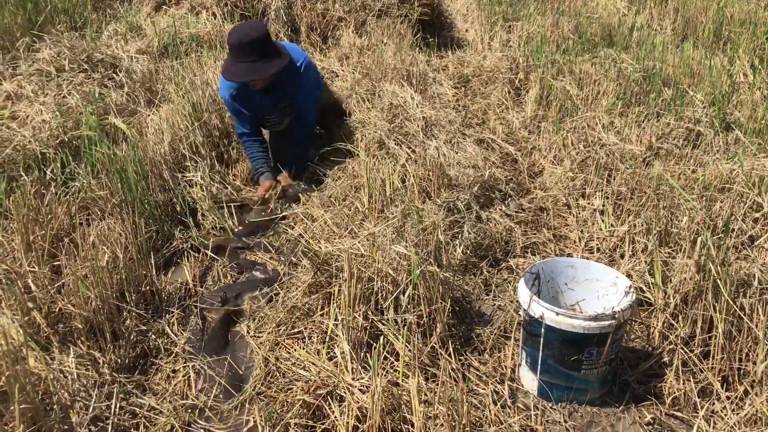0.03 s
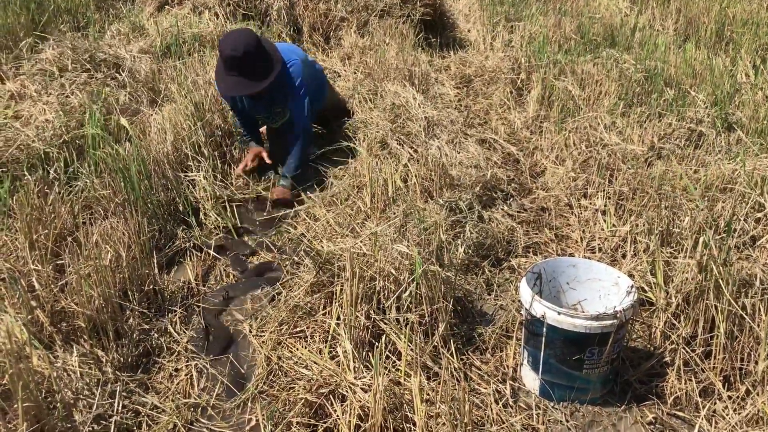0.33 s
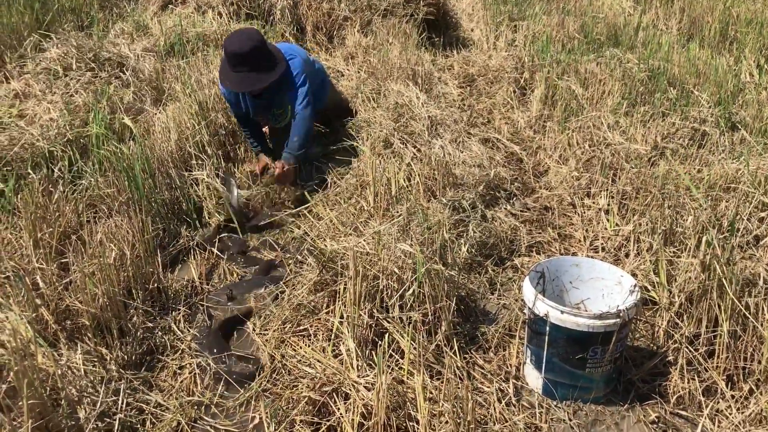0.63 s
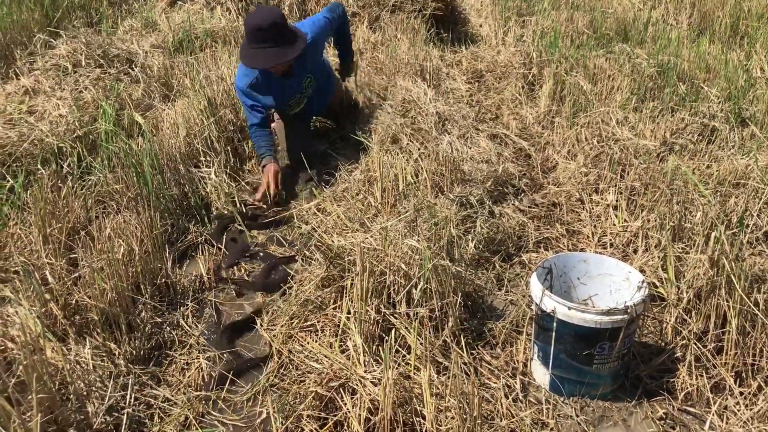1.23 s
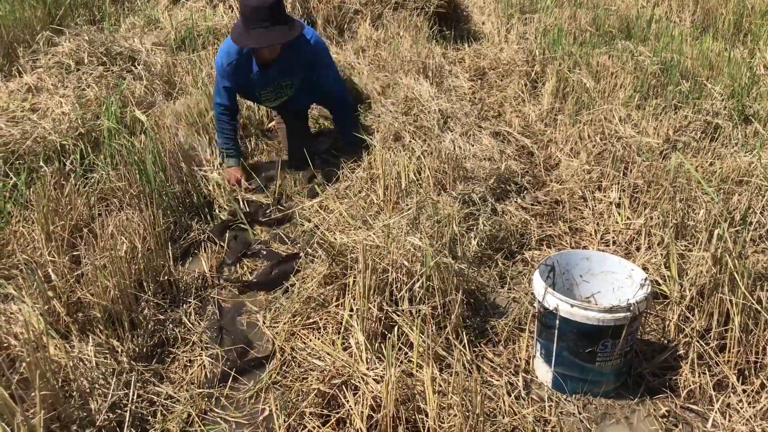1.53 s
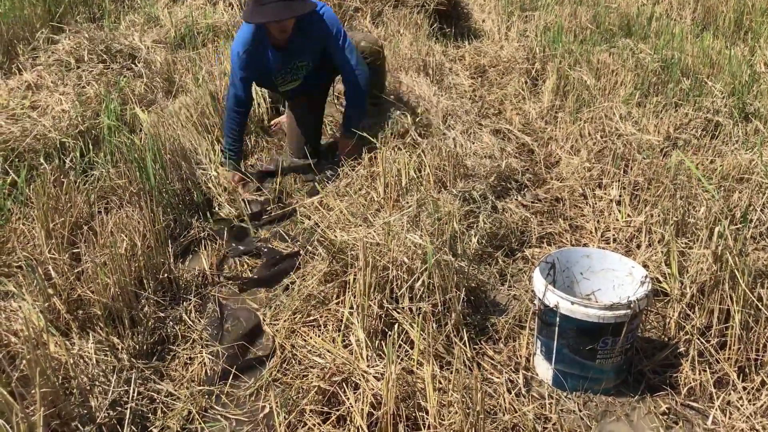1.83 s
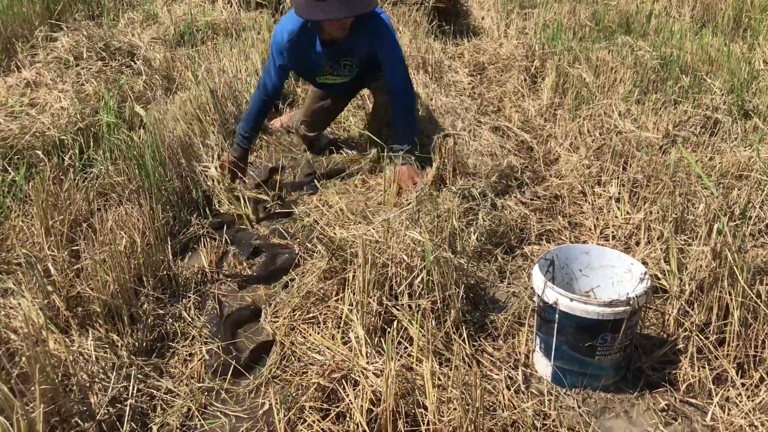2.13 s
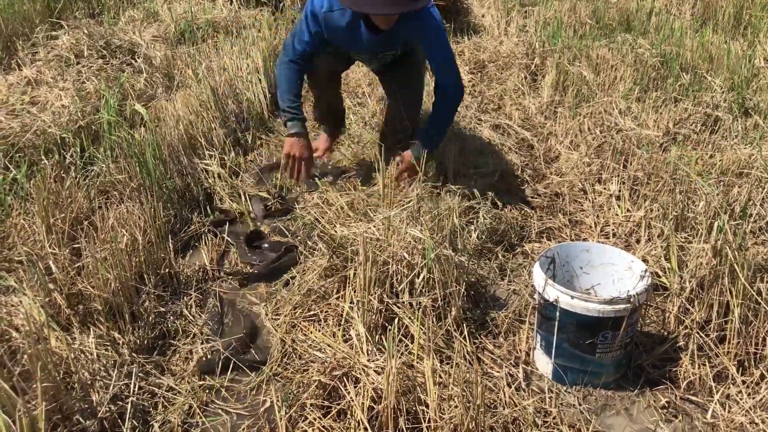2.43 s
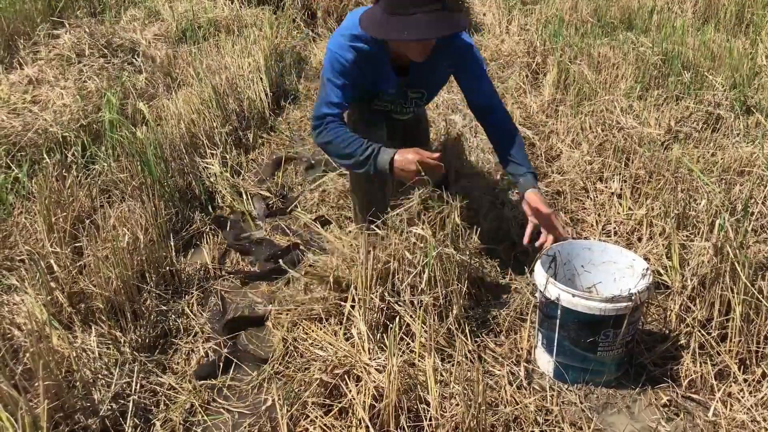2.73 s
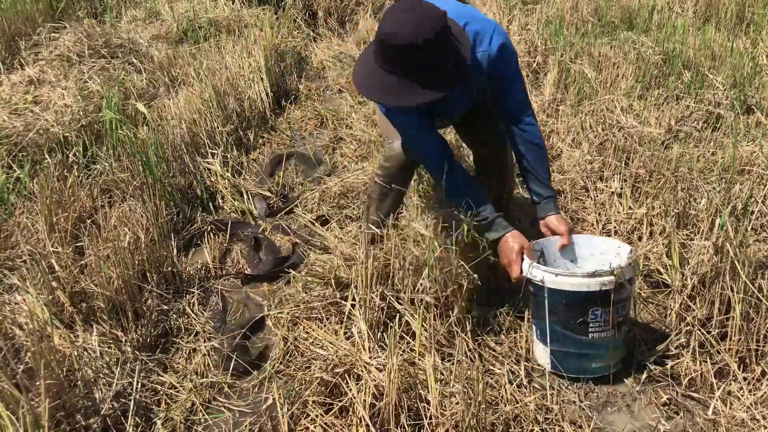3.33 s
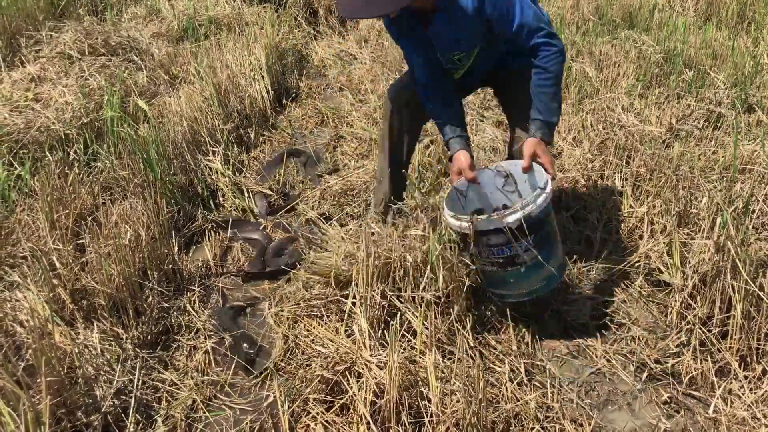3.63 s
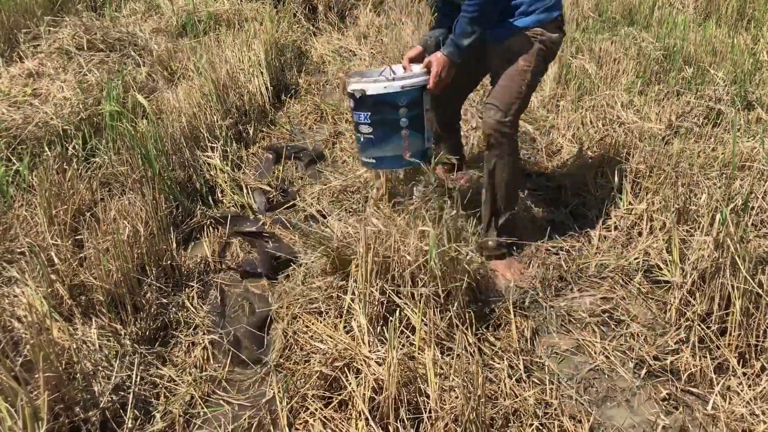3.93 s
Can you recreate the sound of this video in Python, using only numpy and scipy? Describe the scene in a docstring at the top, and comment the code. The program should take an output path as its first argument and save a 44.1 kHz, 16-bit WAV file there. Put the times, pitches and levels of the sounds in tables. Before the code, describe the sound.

Someone moves through rustling dry stubble as wind rumbles, then a plastic bucket knocks.

```python
"""Someone crawls and steps through dry rice stubble, comes closer and lifts a plastic bucket.
At first wind rumbles and thuds on the microphone, over a faint field hush and a few snapping stalks.
From about 1.6 s the straw, a cloud of tiny cracks, swishes louder; from 2 s bundles crunch.
After 3 s the bucket and its handle knock, and stalks patter along its wall as it is pulled up."""
import sys
import numpy as np
from scipy import signal
from scipy.fft import rfft, irfft
from scipy.io import wavfile
from scipy.ndimage import uniform_filter1d

SR = 44100
rng = np.random.default_rng(int(sys.argv[2]) if len(sys.argv) > 2 else 0)


def log_audio(samples):
    """Write samples as a 16-bit WAV file to the path given in sys.argv[1]."""
    # one column per channel
    frames = np.atleast_2d(samples).T
    # limit to full scale, then quantise
    limited = np.clip(frames, -1, 1)
    pcm = np.round(limited * 32767).astype(np.int16)
    wavfile.write(sys.argv[1], SR, pcm)


N = 176400
TIME, FREQS = np.arange(N) / SR, np.fft.rfftfreq(N, 1 / SR)
HIT_AGE = TIME[:SR // 20]  # seconds since a hit began

# How hard the straw is brushed. Each row: time in seconds, level in dB.
BRUSHING = [(.42, -55), (.51, -46.5), (.6, -60.5), (.9, -56), (1.1, -44.5), (1.36, -54.5), (1.53, -66),
            (1.63, -40), (1.78, -45.5), (1.92, -38.5), (2.07, -38), (2.14, -45.5), (2.27, -34), (2.36, -49),
            (2.61, -46.5), (2.66, -34.5), (2.79, -38.5), (2.89, -47.5), (3.04, -39.5), (3.16, -46),
            (3.41, -40), (3.48, -47), (3.68, -45), (3.85, -39)]
# Tone of brushed straw as heard through the microphone, including the microphone's treble peaks
# and dips. Each row: frequency in Hz, gain in dB.
STRAW_MIC_EQ = [(500, 6.5), (1000, -11), (3200, 1), (3800, -6.5), (4900, -8), (6000, -1), (7700, -3.5),
                (8500, 1.5), (9500, 2.5), (10400, -3.5), (11200, 1.5), (12400, -4), (13400, -2.5),
                (14800, -3)]
# Treble tilt on that tone, pivoting at 9 kHz. Each row: time in seconds, slope in dB per octave.
STRAW_TILT = [(.7, 6), (1.1, 2.8), (2.5, 3.5), (3.3, 2.5), (4, 2.5)]
def straw_swish():
    """Stalks slide over each other: tiny cracks in a smooth hiss, with a flickering level."""
    cracks_per_s, spread_db, hiss_share, flicker_db = 5000, 5, 0.59, 2
    edges_hz = np.geomspace(500, 17000, num=12)
    colour, tilt = from_db(at_hz(STRAW_MIC_EQ, FREQS)), in_time(STRAW_TILT)
    broad_cracks = cracks(cracks_per_s, spread_db)
    tilted, plain = 0, 0
    for low, high in zip(edges_hz, edges_hz[1:]):
        grains = rms_one(broad_cracks + cracks(cracks_per_s / 2, spread_db))
        friction = np.sqrt(1 - hiss_share) * grains + np.sqrt(hiss_share) * rng.standard_normal(N)
        band = irfft(rfft(friction) * colour * ((FREQS >= low) & (FREQS < high)), N)
        octaves = np.log2(np.sqrt(low * high) / 9000)
        tilted += band * from_db(tilt * octaves)
        plain += band
    return tilted / np.std(plain) * from_db(in_time(BRUSHING) + flicker_db * drift(rate_hz=7.3))


# Crunches. Each row: centre in seconds, length in seconds, level in dB.
CRUNCHES = [(2.078, 0.022, -33), (2.669, 0.019, -36.5), (2.776, 0.015, -37), (3.349, 0.025, -44),
            (3.43, 0.028, -36), (3.555, 0.065, -47.5), (3.788, 0.018, -45)]
# Tone of crushed stalks. Each row: frequency in Hz, gain in dB.
CRUNCH_EQ = [(900, 2), (1500, 9), (3000, 11.5), (4500, 2.5), (6500, 9.5), (16000, -8)]
def straw_crunches():
    """Bundles crushed under a hand, a foot or the bucket give short, lower clusters of cracks."""
    pressure = sum(from_db(db) * swell(TIME - s, length) for s, length, db in CRUNCHES)
    crackle = coloured(cracks(per_s=1500, spread_db=2.5), CRUNCH_EQ)
    return pressure * evened(crackle, span_s=0.0024)


# Single stalks breaking. Each row: start in seconds, relative peak in dB, stalk pitch in Hz.
SNAPS = [(0.2619, -26, 3230), (0.552, -31, 2600), (0.9978, -27, 7000), (2.6537, -26, 10000),
         (2.6641, -13, 9100), (2.748, -10.5, 10800), (3.3015, -28, 2860), (3.435, -8.5, 10460)]
# Tone of a snap. Each row: frequency in Hz, gain in dB.
SNAP_EQ = [(800, -45), (3000, 0.5), (11000, -4.5)]
def stalk_snaps():
    """A sharp break, then a few milliseconds of splintering, ringing at the stalk's own pitch."""
    break_s, splinter_s, splinter_db, ring_db, trim_db = 0.00044, 0.0062, -20.5, 15.5, 0.5
    out, hz = np.zeros(N + SR), np.fft.rfftfreq(len(HIT_AGE), 1 / SR)
    decay = np.exp(-HIT_AGE / break_s) + from_db(splinter_db) * np.exp(-HIT_AGE / splinter_s)
    for s, db, pitch in SNAPS:
        burst = rng.standard_normal(len(decay)) * decay
        resonance_db = ring_db * swell(np.log2((hz + 1) / pitch), width=0.58)
        crack = irfft(rfft(burst) * from_db(at_hz(SNAP_EQ, hz) + resonance_db))[:len(burst) // 2]
        start = int(s * SR)
        out[start:start + len(crack)] += from_db(db + trim_db) * crack / np.abs(crack).max()
    return out[:N]


def stalk_ticks():
    """Bent stalks let go here and there with a small tick, louder while the straw is brushed."""
    splinter = rng.standard_normal(len(HIT_AGE)) * np.exp(-HIT_AGE / 0.0023)
    ticks = signal.fftconvolve(cracks(per_s=40, spread_db=1.6), splinter)[:N]
    brushing_db = in_time(BRUSHING)
    return coloured(ticks, STRAW_MIC_EQ) * from_db(-59 + .5 * (brushing_db - brushing_db.mean()))


# The bucket's modes. Each row: frequency in Hz, relative level in dB, seconds to fall by 60 dB.
BUCKET_MODES = [(613, 0, 0.0093), (860, -5, 0.053), (1040, -1.5, 0.015), (1590, -2.5, 0.019),
                (1886, -2, 0.01), (2530, -4, 0.011), (3400, -6.5, .018)]
def bucket_ring(contact_hz):
    """The plastic rings briefly; each contact favours nearby modes and varies their strengths."""
    out = 0
    for k, (hz, db, t60) in enumerate(BUCKET_MODES):
        focus_db = 6.5 * swell(np.log2(hz / contact_hz), width=0.57)
        decay = from_db(db + focus_db + rng.normal(0, 2) - 60 * HIT_AGE / t60)
        out += (-1) ** k * decay * np.sin(2 * np.pi * hz * HIT_AGE)
    return out


# Bucket and handle hits. Each row: start in seconds, relative peak in dB, favoured frequency in Hz.
KNOCKS = [(3.0645, -18.5, 1100), (3.203, -23, 1300), (3.2355, -25, 1670), (3.291, -21, 1170),
          (3.313, -23, 1860), (3.332, -24.5, 1210), (3.428, -30, 1090), (3.532, -27.5, 1380),
          (3.771, -28.5, 617)]
def bucket():
    """Gritty knocks on the wall, and stalks that patter along it while it is pulled up."""
    drag_at_s, drag_length_s, drag_db = 3.68, 0.22, -46
    grit, contact_s, trim_db = 0.061, 0.011, -4.5
    touches = cracks(per_s=160, spread_db=6)
    patter = signal.fftconvolve(touches, bucket_ring(BUCKET_MODES[0][0]))[:N]
    out = from_db(drag_db) * rms_one(patter) * swell(TIME - drag_at_s, drag_length_s)
    for s, db, hz in KNOCKS:
        contact = grit * rng.standard_normal(len(HIT_AGE)) * np.exp(-HIT_AGE / contact_s)
        contact[0] += 1  # the clean attack
        knock = signal.fftconvolve(contact, bucket_ring(hz))
        knock *= from_db(db + trim_db) / np.abs(knock).max()
        start = int(s * SR)
        out[start:start + len(knock)] += knock[:N - start]
    return out


# Push of the wind. Each row: time in seconds, level in dB.
WIND_PUSH = [(0, -30), (.15, -32.5), (1, -32), (1.08, -44.5), (1.64, -36.5), (1.78, -50), (2.08, -37.5),
             (2.6, -33), (2.78, -48.5), (2.9, -32.5), (3.36, -36), (3.48, -53), (3.78, -34.5), (4, -51)]
# Tone of the rumble. Each row: frequency in Hz, gain in dB.
RUMBLE_EQ = [(20, -47), (40, -3.5), (70, -0.5), (110, -5), (200, -11), (400, -28.5), (900, -49.5)]
def wind_rumble():
    """Lumpy, low pressure noise on the microphone, with a ragged flutter of small eddies on top."""
    lump_db, swing_db, flutter_db, rate_hz = 5.5, 8.5, -9.5, 21
    rumble = evened(coloured(rng.standard_normal(N), RUMBLE_EQ), span_s=0.24)
    rumble *= from_db(lump_db * drift(rate_hz))
    turbulence = irfft(rfft(rng.standard_normal(N)) * eddy_colour(FREQS, edge_hz=131), N)
    flutter = rms_one(turbulence * from_db(swing_db * np.minimum(drift(rate_hz), 2)))
    return (rumble + from_db(flutter_db) * flutter) * from_db(in_time(WIND_PUSH))


# Flaps of wind. Each row: centre in seconds, length in seconds, relative level in dB, top edge in Hz.
EDDIES = [(0.043, 0.033, -22, 310), (.074, 0.017, -19.5, 517), (0.261, 0.052, -22.5, 268),
          (.478, 0.026, -24.5, 158), (0.691, 0.026, -31.5, 352), (0.786, 0.046, -21.5, 276),
          (0.95, 0.048, -28, 322), (1.495, 0.0079, -29.5, 410), (1.629, 0.017, -27, 213),
          (2.134, 0.015, -25.5, 220), (2.362, 0.028, -31, 256), (2.599, 0.1, -28.5, 232),
          (2.709, 0.026, -27, 236), (3.115, 0.022, -26, 263)]
def wind_eddies():
    """Each eddy hits the microphone as a short flap of turbulence; faster ones reach higher in pitch."""
    out, size, trim_db = np.zeros(N + SR), SR // 5, 1
    t, hz = (np.arange(size) - size // 2) / SR, np.fft.rfftfreq(size, 1 / SR)
    for s, length, db, edge_hz in EDDIES:
        phases = np.exp(2j * np.pi * rng.random(len(hz)))
        turbulence = irfft(eddy_colour(hz, edge_hz) * phases, size)
        start = int(s * SR)
        out[start:start + size] += from_db(db + trim_db) * shaped(turbulence, swell(t, length))
    return out[size // 2:size // 2 + N]


def eddy_colour(hz, edge_hz):
    """Turbulence falls gently from its low hump, then steeply above its edge."""
    hump = hz / np.hypot(hz, 57.5) ** 1.29
    return hump / np.hypot(1, (hz / edge_hz) ** 2.88)


# Thuds of air on the microphone. Each row: centre in seconds, strength in dB, pitch in Hz.
BUFFETS = [(0.7699, -7.5, 240), (0.8351, -13, 200), (0.9853, -13.5, 307), (2.613, -18.5, 183)]
def wind_buffets():
    """A compact vortex passes: one swing of pressure, shorter when its pitch is higher."""
    return sum(from_db(db) * np.imag((1 - 2.4j * hz * (TIME - s)) ** -3.6) for s, db, hz in BUFFETS)


# Two soft swells and a tap. Each row: centre in seconds, length in seconds, level in dB, pitch in Hz.
HOLLOWS = [(0.405, 0.11, -50.5, 1090), (1.17, 0.12, -47, 990), (2.134, 0.0038, -34, 1280)]
def hollow_sounds():
    """Short, hollow swells of noise in a narrow band near 1 kHz."""
    out = np.zeros(N)
    for s, length, db, hz in HOLLOWS:
        band = swell(np.log2((FREQS + 1) / hz), width=0.55)
        noise = irfft(rfft(rng.standard_normal(N)) * band, N)
        out += from_db(db) * shaped(noise, swell(TIME - s, length))
    return out


# Tone of the background bed. Each row: frequency in Hz, gain in dB.
FIELD_EQ = [(400, -14), (650, -1.5), (1150, 1), (2000, -9.5), (3800, -17), (16000, -13.5)]
def field_hush():
    """The far, soft hush of open country, wavering slightly."""
    return coloured(rng.standard_normal(N), FIELD_EQ) * from_db(-52.5 + 1.73 * drift(rate_hz=39))


def from_db(db):
    """Decibels to gain."""
    return 10 ** (np.asarray(db) / 20)


def rms_one(x):
    """Scale to unit rms."""
    return x / np.sqrt(np.mean(x ** 2) + 1e-20)


def in_time(rows):
    """Join (seconds, value) rows by straight lines."""
    return np.interp(TIME, *np.transpose(rows))


def at_hz(eq, hz):
    """Read an EQ curve in dB on a log-frequency axis."""
    points_hz, gains_db = np.transpose(eq)
    return np.interp(np.log(hz + 1e-9), np.log(points_hz), gains_db)


def coloured(x, eq):
    """Filter a full-length signal through an EQ curve; unit rms."""
    return rms_one(irfft(rfft(x) * from_db(at_hz(eq, FREQS)), N))


def drift(rate_hz):
    """Smooth random motion with spread 1."""
    return rms_one(irfft(rfft(rng.standard_normal(N)) / (1 + (FREQS / rate_hz) ** 2), N))


def evened(x, span_s):
    """Hold the short-term level of a noise at 1."""
    size = int(span_s * SR)
    power = uniform_filter1d(uniform_filter1d(x ** 2, size), size)
    return x / np.sqrt(np.abs(power) + 1e-9)


def swell(x, width):
    """A bell around x = 0; width is taken at half height, in seconds or octaves like x."""
    return .5 ** ((2 * x / width) ** 2)


def shaped(noise, envelope):
    """Put an envelope on a noise; the result has the envelope's rms."""
    return rms_one(noise * envelope) * np.sqrt(np.mean(envelope ** 2))


def cracks(per_s, spread_db):
    """Random clicks, many small and a few large; unit rms."""
    sizes = from_db(spread_db * np.minimum(rng.exponential(1, N), 5)) * rng.choice([-1, 1], N)
    return rms_one(sizes * (rng.random(N) < per_s / SR))


def scene():
    """Everything reaches one microphone, the same in both channels."""
    foley = straw_swish() + straw_crunches() + stalk_snaps() + stalk_ticks() + bucket()
    wind = wind_rumble() + wind_eddies() + wind_buffets()
    mono = foley + wind + hollow_sounds() + field_hush()
    return np.array([mono, mono])


def record(dry):
    """A low cut at 31 Hz and a steep high cut at 15.85 kHz."""
    low_cut = signal.butter(2, 31, "high", fs=SR, output="sos")
    high_cut = signal.firwin(255, 15850, fs=SR)
    return signal.fftconvolve(signal.sosfilt(low_cut, dry), high_cut[None], mode="same", axes=1)


dry = scene()
out = record(dry)
log_audio(out)
```